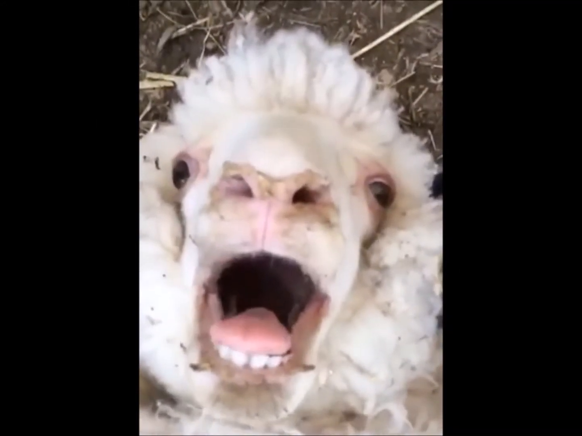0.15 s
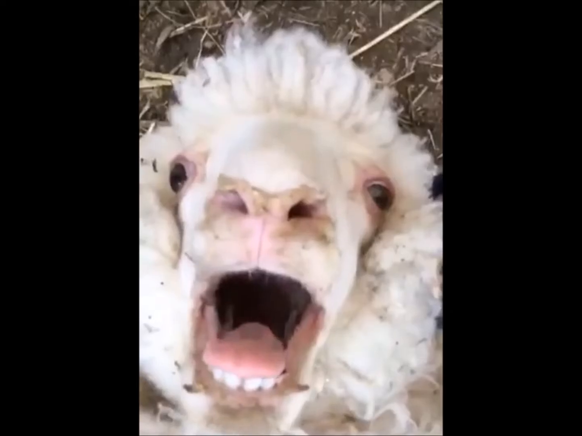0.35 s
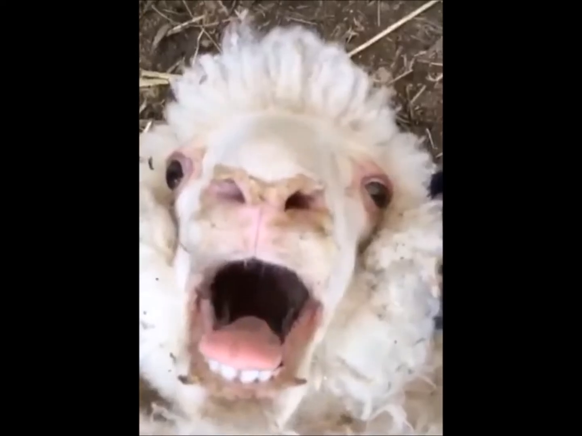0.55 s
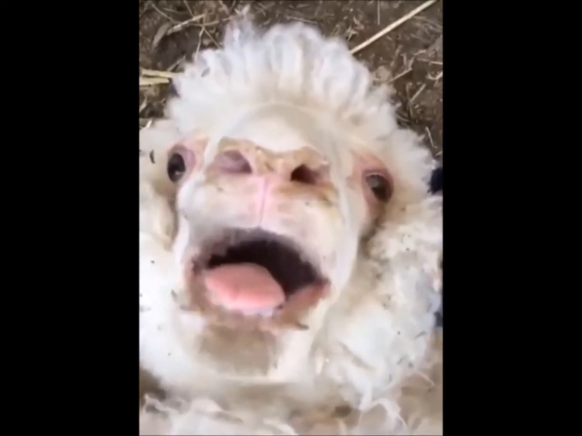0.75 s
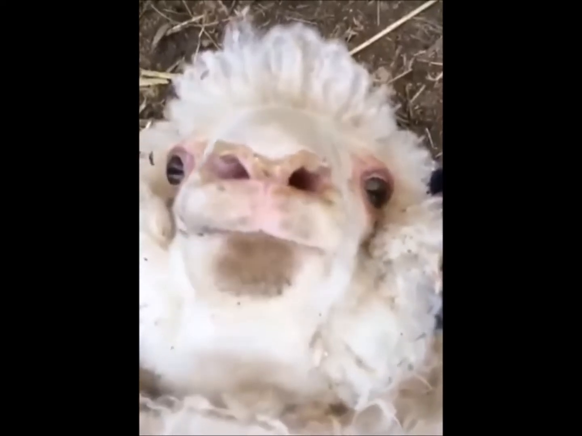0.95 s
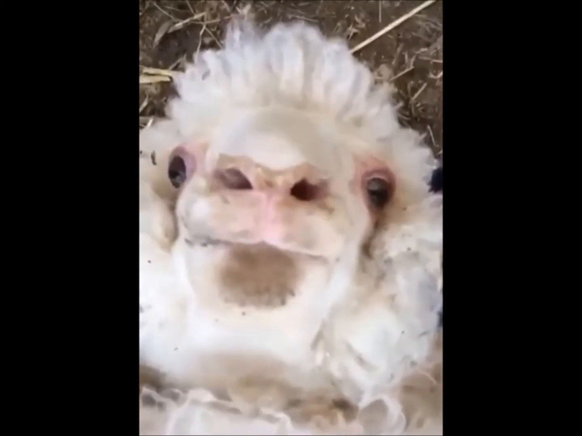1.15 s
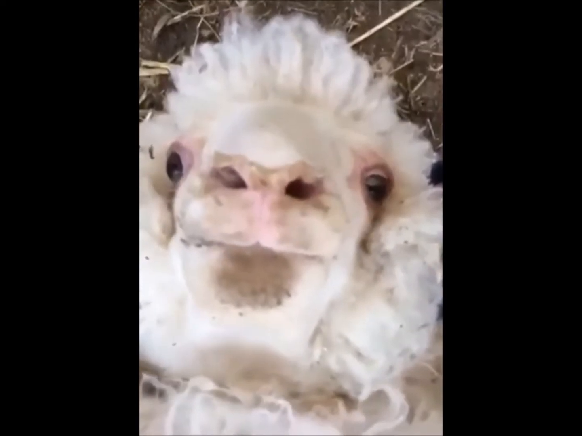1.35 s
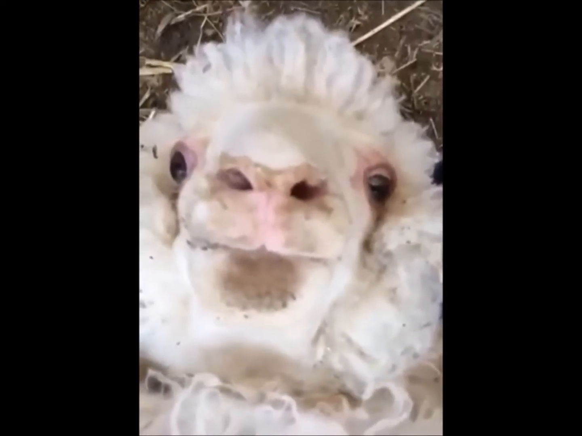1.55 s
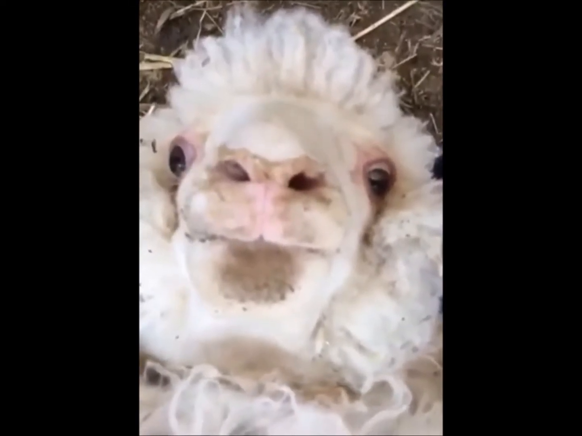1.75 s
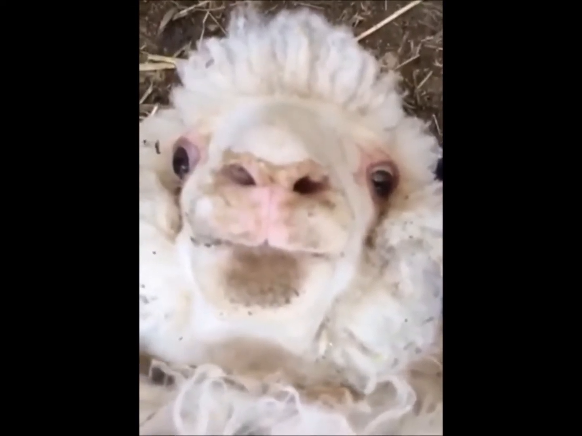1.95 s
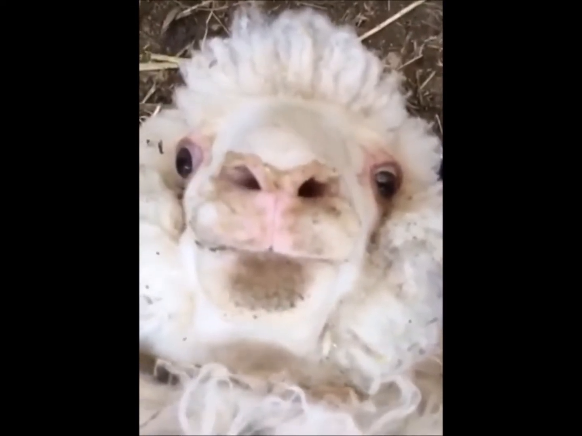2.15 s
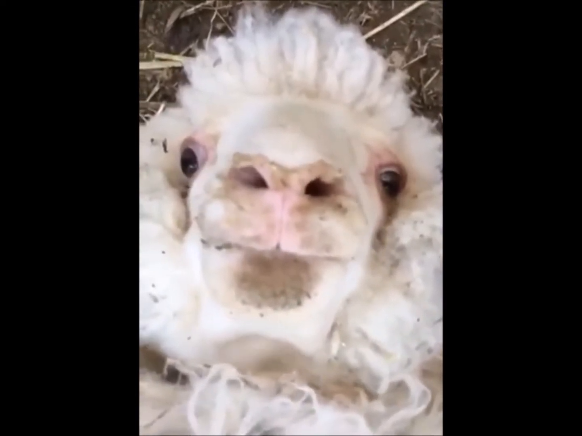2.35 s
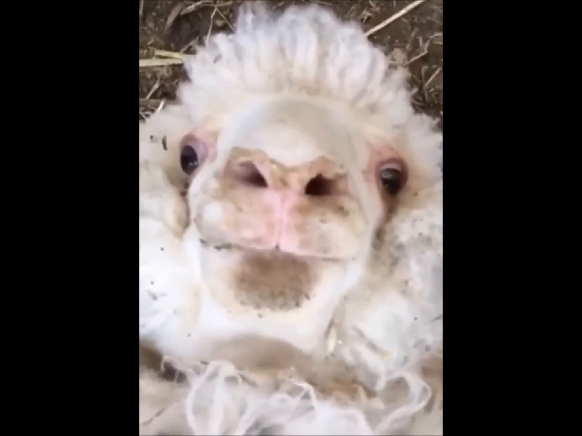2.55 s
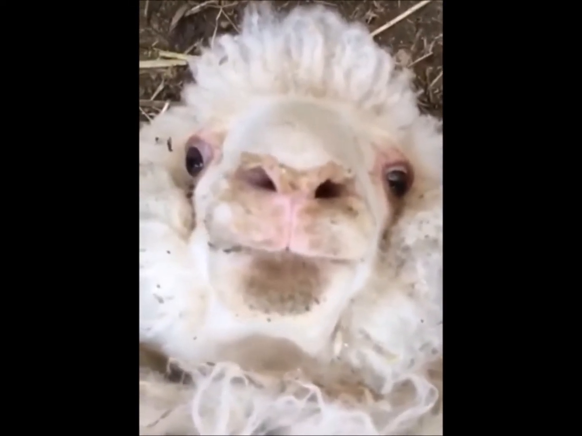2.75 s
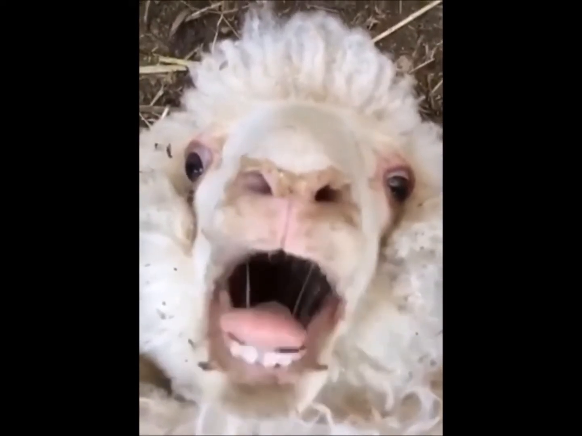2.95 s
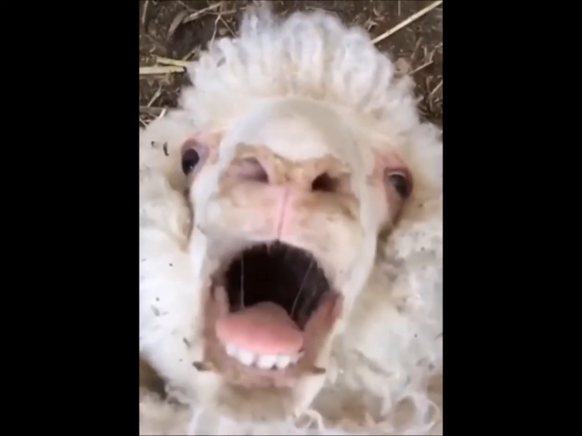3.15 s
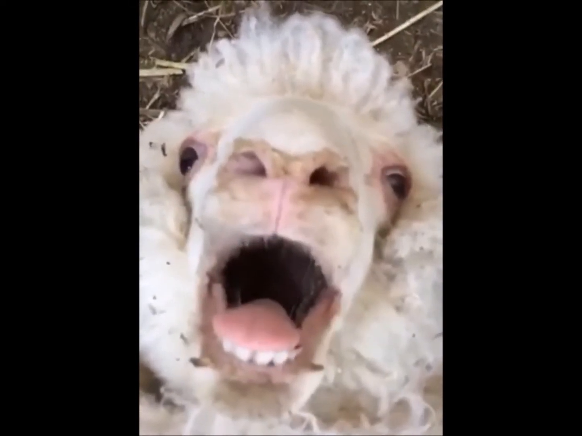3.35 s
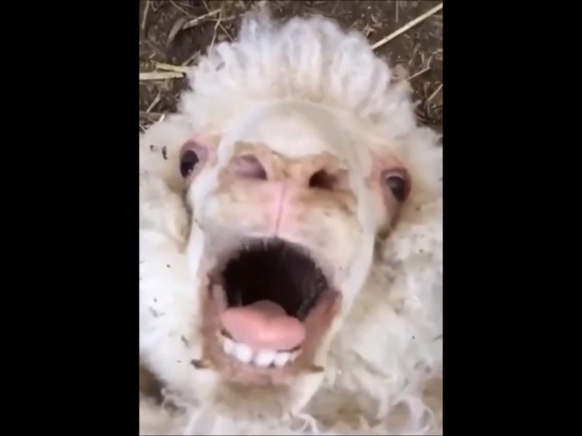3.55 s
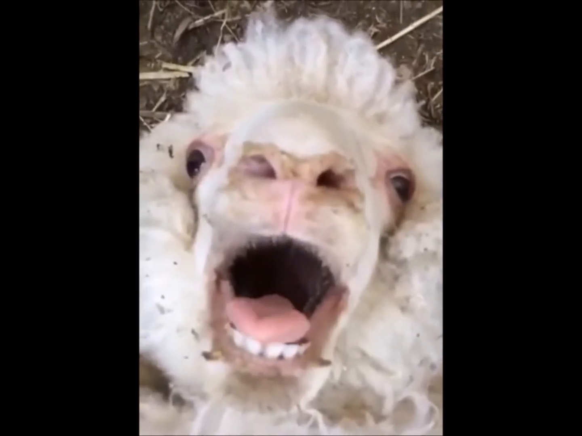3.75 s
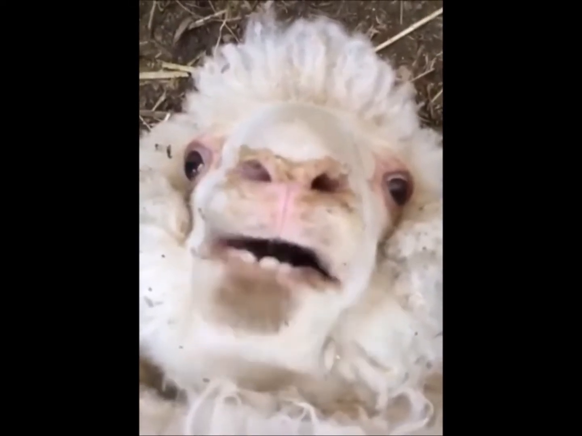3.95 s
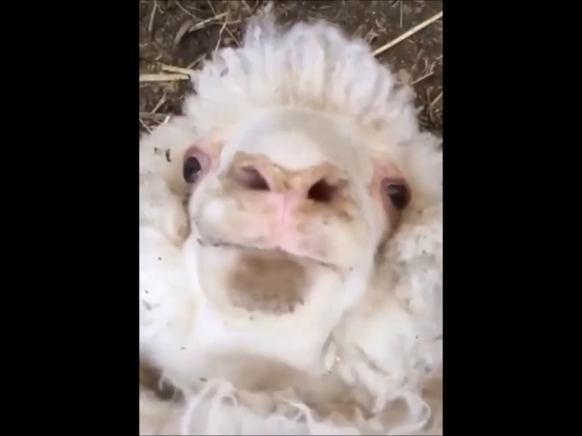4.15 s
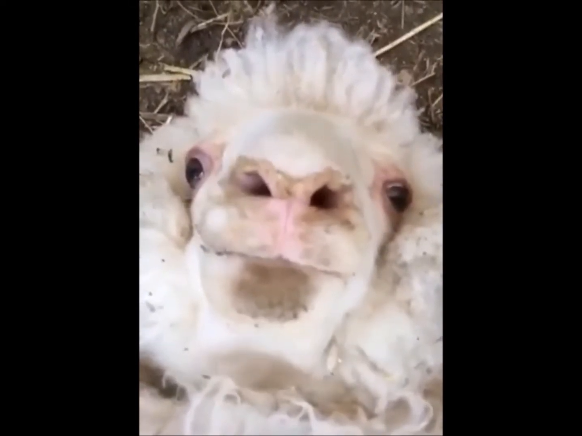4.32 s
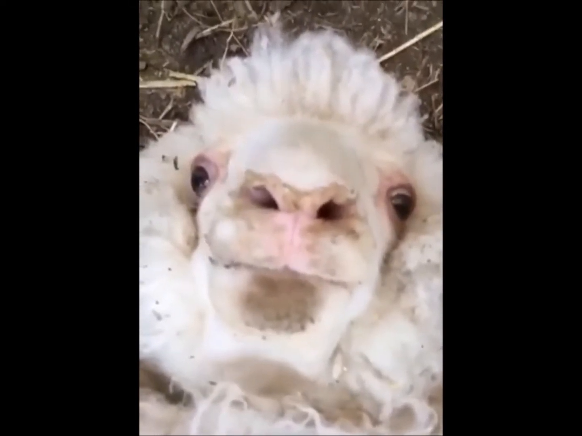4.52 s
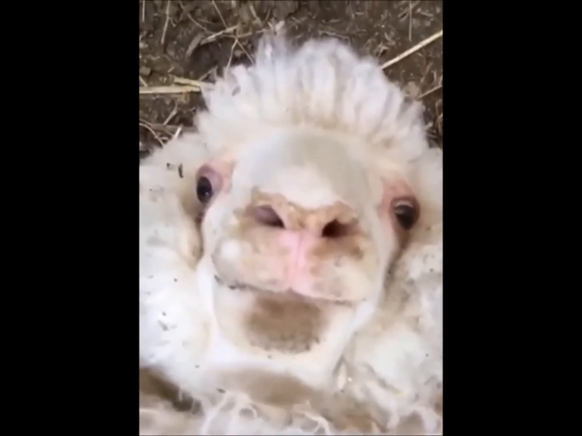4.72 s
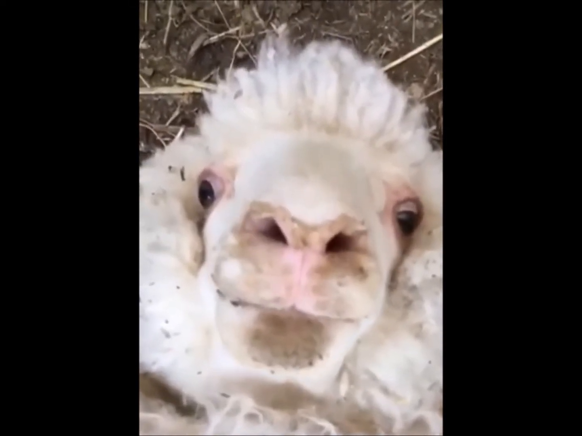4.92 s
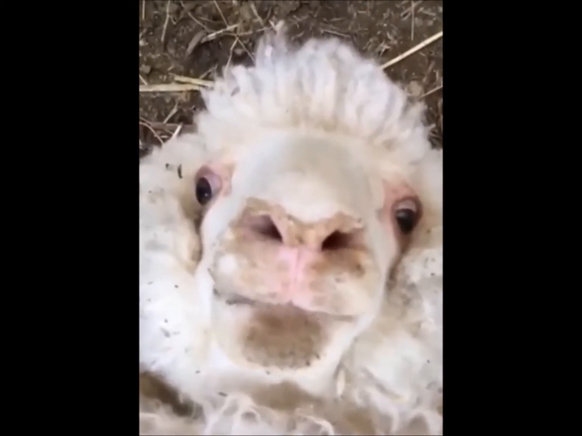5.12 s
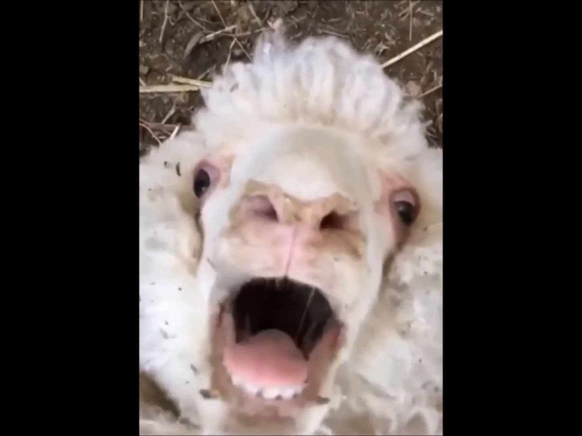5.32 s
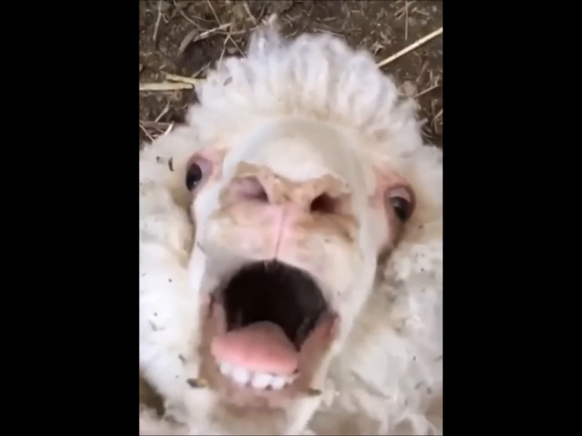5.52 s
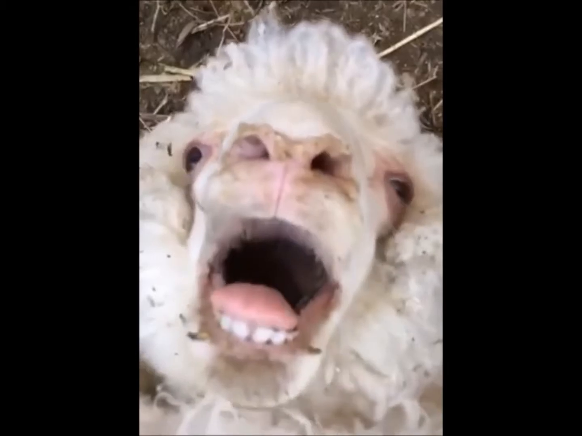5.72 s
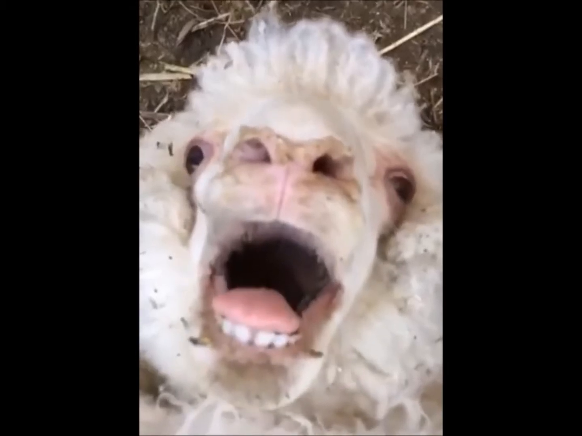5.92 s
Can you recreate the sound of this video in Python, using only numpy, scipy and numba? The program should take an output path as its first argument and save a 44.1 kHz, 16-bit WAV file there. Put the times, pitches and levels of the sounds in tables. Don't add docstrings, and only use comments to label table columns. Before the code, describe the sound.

Three loud held sheep calls, dry and close, harsh and nasal with a bright edge. The first is clean and falls at its end; the second and third break in with a rattling rasp, then lock to a steady buzz. The gaps are very quiet: airy nose hiss, tiny wet lip smacks, a sharp tick, straw rustle, soft bumps on the microphone and low wind puffs. The last call is cut mid-cry.

```python
import sys
import numpy as np
from scipy import signal
from scipy.fft import rfft, irfft
from scipy.io import wavfile
from scipy.ndimage import uniform_filter1d
from numba import njit

SR = 44100
rng = np.random.default_rng(int(sys.argv[2]) if len(sys.argv) > 2 else 0)


def inscribe(sig):
    pcm = np.round(np.clip(np.atleast_2d(sig).T, -1, 1) * 32767)
    wavfile.write(sys.argv[1], SR, pcm.astype(np.int16))


def undo_db(level):
    steps = np.asarray(level, float) / 20
    return 10 ** steps


N = 268128


def read(table):
    s, *columns = np.transpose(table)
    return [np.interp(np.arange(N) / SR, s, c) for c in columns]


def during(tables):
    t = np.arange(N) / SR
    inside = sum(1. * (t >= c[0][0]) * (t <= c[-1][0]) for c in tables)
    return uniform_filter1d(inside, size=200)


def unit(x):
    return x / np.sqrt(np.mean(x ** 2))


def colour(x, points):
    hz, db = np.transpose(points)
    grid_hz = np.linspace(1, SR / 2, 4097)
    gain_db = np.interp(np.log(grid_hz), np.log(hz), db, left=-60, right=-60)
    cepstrum = irfft(np.log(undo_db(gain_db)))
    cepstrum[1:4096] *= 2
    cepstrum[4097:] = 0
    impulse = irfft(np.exp(rfft(cepstrum)))
    return unit(signal.fftconvolve(x, impulse)[:N])


@njit
def svf(x, hz, width):
    y, b, l = np.empty((2, len(x))), 0., 0.
    for i in range(len(x)):
        g, k = np.tan(np.pi * hz[i] / SR), width[i] / hz[i]
        v = (b + g * (x[i] - l)) / (1 + g * (g + k))
        y[0, i], y[1, i] = k * v, l + g * v
        b, l = 2 * v - b, l + 2 * g * v
    return y


def resonance(x, hz, width_hz):
    return svf(x, hz * np.ones(N), width_hz * np.ones(N))


def walk(rate_hz):
    k = int(SR / rate_hz)
    held = np.repeat(rng.standard_normal(N // k + 1), k)
    return unit(uniform_filter1d(uniform_filter1d(held, k), k)[:N])


def folds(hz, hoarse, slip=.14, waver=.04, scatter_db=7, throb_db=3):
    phase = np.cumsum(hz * (1 + waver * hoarse * walk(40))) / SR
    cycles = np.arange(1, int(phase[-1]))
    at = np.interp(cycles, phase, np.arange(N))
    chance = rng.standard_normal((2000, 2))[:len(cycles)].T
    h = hoarse[at.astype(int)]
    at = at + slip * h ** 1.6 * chance[0] * SR / hz[at.astype(int)]
    throb = abs(walk(45)[at.astype(int) % N])
    size = undo_db(h * (7 - scatter_db * abs(chance[1]) - throb_db * throb))
    place = at.astype(int)[:, None] + np.arange(-7, 9)
    lag = place - at[:, None]
    shape = np.sinc(lag) * np.cos(np.pi * lag / 16) ** 2
    pulses = np.zeros(N + 16)
    np.add.at(pulses, np.clip(place, 0, N), size[:, None] * shape)
    return unit(pulses[:N]), phase


def glottis(hz, hoarse):
    flap_hz, flap_db = 40, -20
    pulses, phase = folds(hz, hoarse)
    flap = np.cos(np.pi * np.cumsum(flap_hz * (1 + .2 * walk(12))) / SR) ** 6
    pulses = pulses * undo_db((hoarse - .02) * (1.25 - hoarse) * (flap_db * flap + 4))
    air = unit(rng.standard_normal(N) * (0.94 + np.exp(-(phase % 1) / 0.21)))
    return pulses + (undo_db(-23) + undo_db(-8) * hoarse) * air, air, phase


def throat(voice, controls, jaw, second_hz, fourth_hz):
    # First, second, third resonance with the mouth wide [Hz]
    open_hz = [913.5, 1890, 2448]
    # First, second, third width [Hz]
    open_width_hz = [39, 85, 120]
    tongue_hz = [55, -13.5, 60]
    tongue_width_hz = [100, 8.8, -18.5]
    rasp_hz = [47, 152, -59]
    rasp_width_hz = [-20, 50, 60]
    shut_hz = [40, -150, 120]
    shut_width_hz = [150, 300, 300]
    lips_hz, shake = -250, .03
    _, _, hoarse, shut = controls
    centres = [np.dot(c, controls) for c in zip(open_hz, tongue_hz, rasp_hz, shut_hz)]
    width_rows = zip(open_width_hz, tongue_width_hz, rasp_width_hz, shut_width_hz)
    widths = [np.maximum(np.dot(c, controls), 30) for c in width_rows]
    centres[1:] = centres[1] + second_hz, centres[2] * (1 + jaw / 100)
    centres[0] = centres[0] + lips_hz * shut * hoarse ** 2
    centres[1:] = [c * (1 + shake * np.sqrt(hoarse - .02) * walk(35)) for c in centres[1:]]
    fourth = fourth_hz * (1 + 0.71 * jaw / 100), 210
    for centre, width in [*zip(centres, widths), fourth]:
        voice = resonance(voice, centre, width)[1]
    return voice / np.sqrt(uniform_filter1d(voice ** 2, size=1400))


def bypass_treble(source, air, treble_db, start_s):
    # time in seconds, depth in dB, length in seconds.
    catches = [
        (0.73, -20, .004),
        (3.033, -14, .005),
        (3.139, -18, .005),
        (3.204, -22, .004),
        (3.861, -18, .006),
        (5.465, -22, .004),
        (5.572, -16, .005),
        (5.615, -18, .005),
    ]
    # frequency in Hz, level in dB per Hz.
    treble_colour = [(2060, -14.5), (3500, 6.5), (3800, -2.5), (4600, -5), (5800, -0.5), (7420, -4.5),
                     (7910, -11), (9490, -1), (10400, -7.5), (13500, -43), (22000, -120)]
    patch_hz = [4500, 5500, 6500, 7400, 9300]
    patch_db, burst_db, burst_s = 2.5, 2.5, 0.065
    t = np.arange(N) / SR
    treble_db = treble_db + sum(d * np.exp(-((t - s) / w) ** 2) for s, d, w in catches)
    treble_db = treble_db + sum(burst_db * np.exp(-abs(t - s - .05) / burst_s) for s in start_s[1:])
    treble = colour(source + undo_db(-8) * air, treble_colour)
    swells = 0
    for f in patch_hz:
        gain = undo_db(patch_db * walk(7)) - 1
        swells = swells + gain * resonance(treble, f * (1 + .02 * walk(3)), 800)[0]
    return undo_db(treble_db) * (treble + swells)


def sheep():
    # time in seconds, level in dB.
    bleats = [
        [(0.0, -22), (0.014, -21), (0.724, -21), (0.772, -23), (0.79, -27), (0.835, -69)],
        [(2.892, -58), (2.906, -55), (2.91, -27), (2.93, -38), (2.955, -23.5), (3.463, -21), (3.849, -24),
         (3.905, -28), (3.965, -75)],
        [(5.214, -46), (5.234, -41), (5.238, -27), (5.249, -33), (5.253, -24), (5.768, -20), (6.08, -20)],
    ]
    # time in seconds, pitch in Hz.
    pitch = [
        [(0.0, 182.0), (0.22, 179.1), (0.42, 184.8), (0.556, 186.2), (0.624, 184.4), (0.724, 177.5),
         (0.77, 168), (0.794, 157.5), (0.81, 157.0)],
        [(2.95, 149), (3.03, 162), (3.142, 196), (3.21, 175.9), (3.39, 178.3), (3.53, 177.3), (3.74, 173),
         (3.81, 168.4), (3.91, 160.8)],
        [(5.24, 174), (5.31, 168), (5.42, 180), (5.5, 192), (5.6, 185), (5.69, 184.2), (5.784, 181.9),
         (5.918, 180.4), (6.08, 177.3)],
    ]
    # time in seconds, hoarseness 0-1.
    rasp = [
        [(0, .02), (.7, .02), (.73, .16), (.75, .11), (.79, .16), (.84, .35)],
        [(2.9, 1), (3.15, .9), (3.19, .35), (3.25, .05), (3.76, .02), (3.84, .09), (3.91, .12), (3.97, .35)],
        [(5.2, 1), (5.42, .7), (5.5, .58), (5.6, .42), (5.645, .27), (5.69, .1), (5.85, .02), (6.08, .02)],
    ]
    # time in seconds, tongue raised 0-1, jaw shift of the upper resonances in %,
    # brightness in dB, whistle in dB rel.
    mouth = [
        [(0, 0.15, 3, -13, -17.5), (.25, 0.17, 0.5, -7.5, -21.5), (.5, 0.13, -4, -8, -21),
         (.7, 0.14, 1.7, -15.5, -24), (.8, 0, 7, -22, -25)],
        [(2.92, 0.5, -4, -11.5, -10), (2.99, 0.26, 6.5, -21.5, -27), (3.15, 0.03, 4, -16.5, -26),
         (3.23, 0.15, 0.5, -17, -10), (3.42, 0.42, 3, 1.5, -13), (3.62, 0.6, -1, 0.5, -21.5),
         (3.8, 0.7, 1.5, -10, -17), (3.92, 0, 11.5, -29, -38.5)],
        [(5.23, 0.31, 3, -29, -25.5), (5.38, 0, 6.5, -24, -14.5), (5.46, 0, 3, -11, -23.5),
         (5.66, .1, 3, -31, -14.5), (5.9, 0.25, -0.5, 0.5, -12.5), (6.08, 0.2, 1, -12, -16.5)],
    ]
    # start in seconds, second resonance shift in Hz, fourth resonance in Hz,
    # whistle in Hz, hum in dB rel.
    settings = [
        (0, -1.5, 3170, 8070, -31.5),
        (2.9, -7, 3084, 7930, -24),
        (5.2, 40.5, 3060, 7945, -24),
    ]
    # frequency in Hz, level in dB per Hz.
    chest_colour = [(200, -28), (300, -16), (360, -2), (550, 2), (800, -27.5)]
    # mouth wide, tongue adds, rasp adds, shutting adds [dB]
    treble_mix_db = [-16.5, 3.5, 0.3, 2.5]
    chest_mix_db = [-5, 11.5, -1.5, 7.5]
    hum_mix_db = [1.46, 2.5, 5, -3]
    wide_db, shut_span_db = -22.5, 14.5
    whistle_width_hz, whistle_rasp_hz, whistle_shut_hz = 180, -1200, -700
    rasp_throb_db, rasp_flicker_db = 1, 3
    pocket_hz, pocket_width_hz, pocket_share, pocket_per_jaw = 3410, 260, .45, -0.18

    t = np.arange(N) / SR
    db, hz, hoarse = (read(sum(table, []))[0] for table in (bleats, pitch, rasp))
    tongue, jaw, bright_db, whistle_db = read(sum(mouth, []))
    tongue = np.clip(tongue, 0, 1)
    shut = np.clip((wide_db - db) / shut_span_db, 0, 1)
    controls = np.array([np.ones(N), tongue, hoarse, shut])
    start_s, *columns = np.transpose(settings)
    bleat = np.searchsorted(start_s[1:] - .5, t)
    second_hz, fourth_hz, whistle_hz, hum_db = (c[bleat] for c in columns)
    bright_db = bright_db + rasp_flicker_db * np.sqrt(hoarse) * np.clip(walk(60), -3, 1)
    whistle_hz = whistle_hz + hoarse ** 2 * (whistle_rasp_hz + whistle_shut_hz * shut)
    treble_db, chest_db = np.dot(treble_mix_db, controls), np.dot(chest_mix_db, controls)
    hum_db = hum_db + np.dot(hum_mix_db, controls)

    source, air, phase = glottis(hz, hoarse)
    voice = signal.sosfilt(signal.butter(4, 270, "high", fs=SR, output="sos"), source)
    voice = voice + undo_db(chest_db - 10.0) * colour(source, chest_colour)
    voice = voice + undo_db(bright_db + 9.0) * np.diff(source, prepend=0)
    voice = throat(voice, controls, jaw, second_hz, fourth_hz)
    whistle = resonance(source + undo_db(-6.5) * air, whistle_hz, whistle_width_hz * (1 + 4.0 * hoarse))[0]
    voice = voice + undo_db(whistle_db) * unit(whistle)
    voice = voice + bypass_treble(source, air, treble_db, start_s)
    swallowed = np.clip(pocket_share + pocket_per_jaw * jaw, 0, 1)
    voice = voice - swallowed * resonance(voice, pocket_hz, pocket_width_hz)[0]
    voice = voice * undo_db(rasp_throb_db * np.sqrt(hoarse) * np.clip(walk(45), -3, 1.2))
    voice = voice + undo_db(hum_db) * np.sin(2 * np.pi * phase)
    return -voice * undo_db(db + 0.83) * during(bleats)


def wind():
    # time in seconds, level in dB.
    gusts = [(.05, -70), (.76, -79.5), (1.0, -72.5), (1.3, -63), (1.4, -61.5), (1.8, -60.5), (2.1, -58),
             (2.39, -51), (2.45, -55.5), (2.9, -60), (3.25, -71), (3.7, -69.5), (4.0, -58.5), (4.9, -59.5),
             (5.15, -49), (5.35, -59), (5.65, -67), (6.08, -70)]
    # frequency in Hz, level in dB per Hz.
    gust_colour = [(12, -38), (22, -19), (68, -3), (111, -11), (139, -20), (211, -27), (320, -40),
                   (440, -62)]
    # time in seconds, peak in dB, fade in seconds.
    puff_rows = [
        (0, -44, .025),
        (.8, -53.5, .015),
        (2.982, -36, 0.032),
        (3.201, -57, 0.025),
        (4.109, -40, 0.0086),
        (4.47, -53, 0.021),
        (4.67, -59.5, 0.069),
        (5.27, -38.5, 0.023),
        (5.74, -52, 0.035),
    ]
    # frequency in Hz, level in dB per Hz.
    puff_colour = [(25, -25), (70, -9), (130, -2), (220, -3), (400, -30)]
    t = np.arange(N) / SR
    puffs = sum(undo_db(db) * np.exp(-abs(t - s) / fade_s) for s, db, fade_s in puff_rows)
    gust = colour(rng.standard_normal(N), gust_colour) * undo_db(read(gusts)[0] + 1.9 * walk(2.2))
    return gust + puffs * colour(rng.standard_normal(N), puff_colour)


def snuffle():
    # start in seconds, length in seconds, level in dB, hiss in dB rel.
    sniffs = [(0.837, 0.081, -74.5, 5), (1.027, .26, -56, -3.5), (1.332, 0.17, -71, 5.5),
              (1.676, 0.023, -66, -11), (1.92, 0.018, -65.5, -25), (2.073, .02, -73, -30),
              (2.146, 0.15, -68, -6), (2.308, 0.019, -62.5, 0), (2.477, 0.055, -65.5, 8.5),
              (2.581, .012, -62, -21), (2.648, .03, -65, -24), (2.759, .03, -67, -25),
              (4.238, 0.21, -69.5, -7.5), (4.436, 0.025, -64, -6), (4.537, 0.044, -66.5, -5),
              (4.64, 0.026, -69.5, -3), (4.738, 0.031, -61, -21), (4.805, 0.48, -67, -26)]
    pauses = [
        [(.83,), (2.89,)],
        [(3.96,), (5.21,)],
    ]
    # frequency in Hz, width in Hz, level in dB.
    passages = [(321, 66, 6.5), (620, 220, 1), (903, 80, 2), (1237, 56, 3), (1794, 38, 2.5), (2260, 66, -4),
                (3070, 50, -17), (3530, 85, -39), (5270, 140, -25)]
    # frequency in Hz, level in dB per Hz.
    hiss_colour = [(1350, -15), (2300, -16.5), (2770, 3), (3510, -4), (3890, 8.5), (4530, 0.5), (5020, 3),
                   (9030, 1.5), (10600, -5.5), (13800, -32), (22000, -120)]
    nostril_hz = [1950, 2900, 3250, 3800, 4200, 4500, 5100]
    nostril_width_hz, nostril_db = 90, -4
    attack_s, release_s, rest_db, rest_hiss_db = 0.012, 0.037, -73.5, -8
    t = np.arange(N) / SR
    flow, hiss_flow = undo_db(rest_db), undo_db(rest_db + rest_hiss_db)
    for s, length_s, db, hiss_db in sniffs:
        fade = np.exp(-np.maximum(t - s - length_s, 0) / release_s)
        shape = np.clip((t - s) / attack_s, 0, 1) * fade
        flow = np.hypot(flow, undo_db(db) * shape)
        hiss_flow = np.hypot(hiss_flow, undo_db(db + hiss_db) * shape)
    air = rng.standard_normal(N)
    nose = sum(undo_db(g + 6.7 * walk(20)) * resonance(air, f, w)[0] for f, w, g in passages)
    straw = colour(rng.standard_normal(N), [(150, -18.0), (400, -0.5), (1200, -1.5), (2600, -18.0)])
    body = unit(nose) + undo_db(-7) * straw
    nostrils = sum(undo_db(6 * walk(8)) * resonance(air, 1. * f, nostril_width_hz)[0] for f in nostril_hz)
    hiss = colour(rng.standard_normal(N), hiss_colour) + undo_db(nostril_db) * unit(nostrils)
    hiss = hiss * undo_db(-10 + 2 * walk(30))
    return (undo_db(-2.5 + 1.4 * walk(19)) * body * flow + hiss * hiss_flow) * during(pauses)


def contacts(table, push_s, click_db, click_hz):
    t = np.arange(8000) / SR
    mix = np.zeros(N + len(t))
    dull = signal.butter(4, click_hz, fs=SR, output="sos")
    clicks = signal.sosfilt(dull, rng.standard_normal((len(table), len(t))))
    for (s, db, hz, ring_s), click in zip(table, clicks):
        rise = 1 - np.exp(-t / push_s)
        ring = np.sin(2 * np.pi * hz * t) * 1000. ** (-t / ring_s)
        snap = undo_db(click_db) * unit(click) * np.exp(-t / (2 * push_s))
        mix[int(s * SR):][:len(t)] += undo_db(db) * rise * (2.0 * ring + snap)
    return mix[:N]


def scene():
    # time in seconds, peak in dB, ring in Hz, ring in seconds.
    smacks = [
        (1.675, -64.5, 668, 0.079),
        (1.929, -52.5, 874, 0.069),
        (2.075, -58.5, 493, 0.044),
        (2.258, -58, 500, 0.041),
        (2.386, -60, 470, 0.045),
        (2.595, -34, 564, 0.0084),
        (2.667, -46, 400, 0.053),
        (2.769, -52.5, 664, 0.018),
        (4.56, -64, 1075, 0.051),
    ]
    knocks = [
        (1.22, -45, 155, 0.15),
        (2.334, -49, 178, 0.078),
        (2.594, -47.5, 199, 0.043),
        (4.103, -36, 109, 0.048),
        (4.445, -56.5, 174, 0.069),
        (4.66, -59, 206, 0.076),
    ]
    voice = sheep()
    t = np.arange(SR // 4) / SR
    echo = rng.standard_normal(len(t)) * np.exp(-np.log(1000) * t / .08)
    pen = signal.fftconvolve(voice, echo)[:N]
    small = wind() + snuffle()
    small = small + contacts(smacks, 0.0018, -24, 3800) + contacts(knocks, 0.003, 3.0, 296)
    return (voice + undo_db(-44) * pen + small)[None]


def band_limit(x):
    return signal.sosfilt(signal.butter(12, 11320, fs=SR, output="sos"), x)


def record(dry):
    bass_cut = signal.butter(2, 45, "high", fs=SR, output="sos")
    top_cut = signal.ellip(8, .3, 60, 10315, fs=SR, output="sos")
    rounded = signal.sosfilt(bass_cut, .35 * np.tanh(dry / .35))
    mix = signal.sosfilt(top_cut, rounded) + undo_db(-95) * rng.standard_normal(dry.shape)
    return band_limit(mix)


dry = scene()
out = record(dry)
inscribe(out)
```